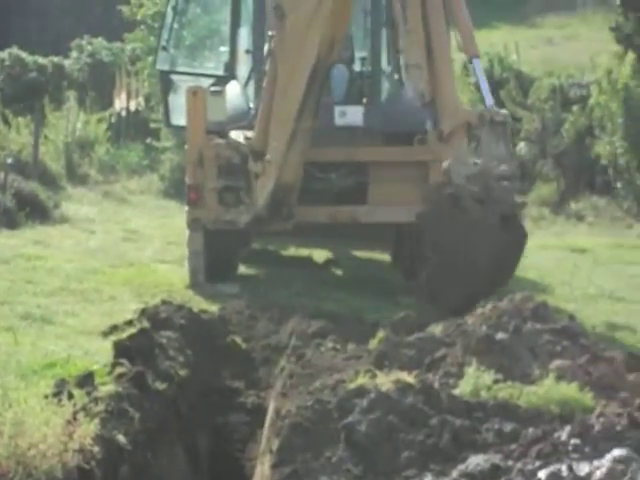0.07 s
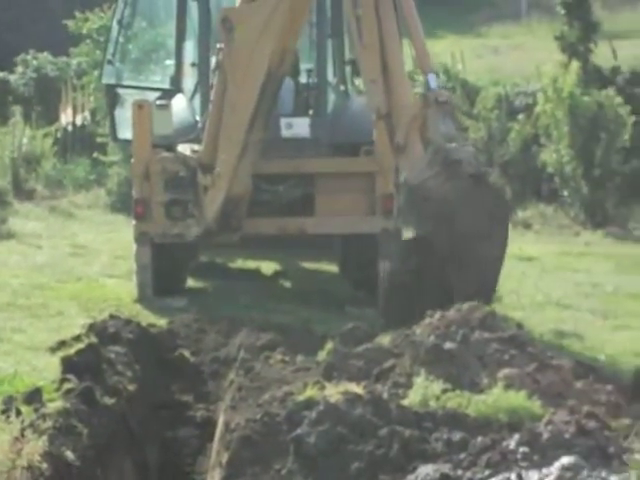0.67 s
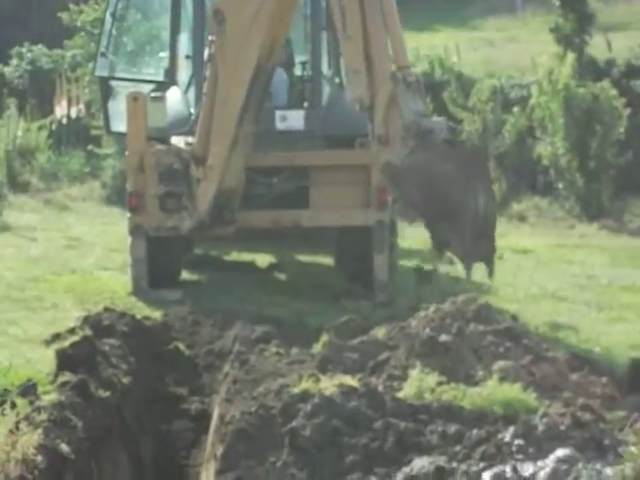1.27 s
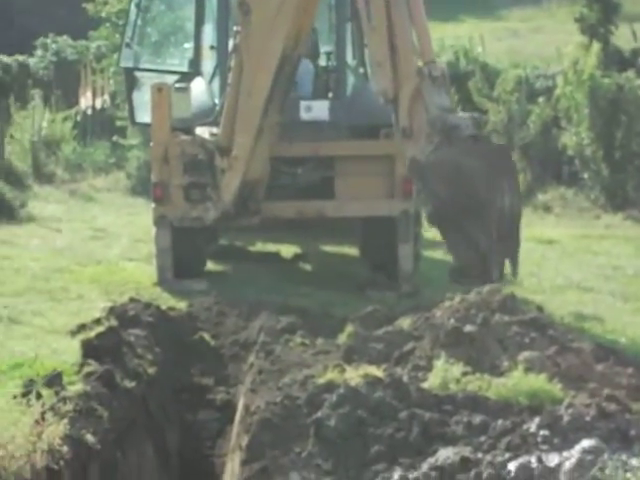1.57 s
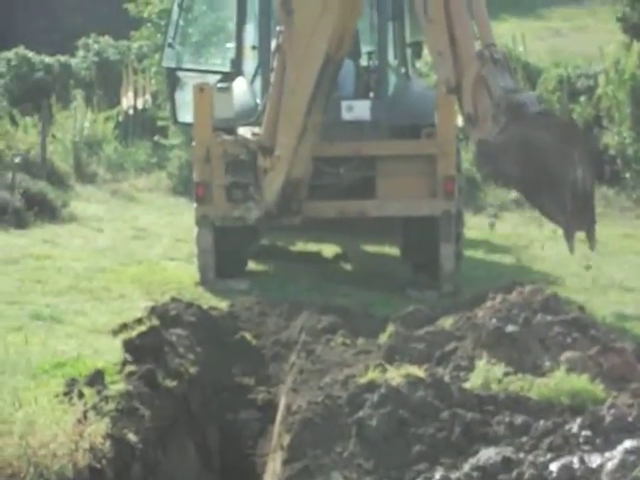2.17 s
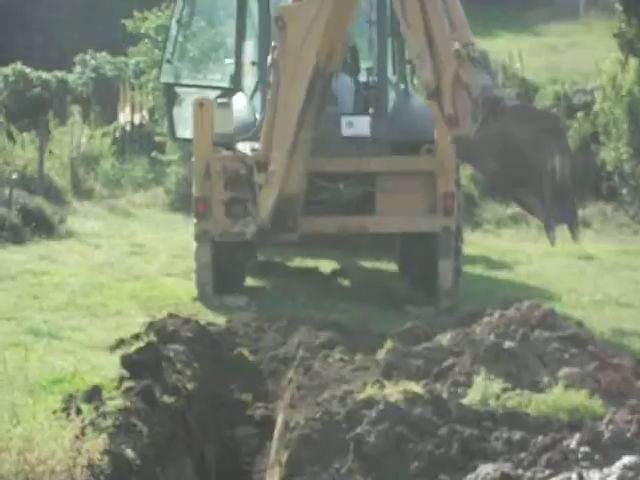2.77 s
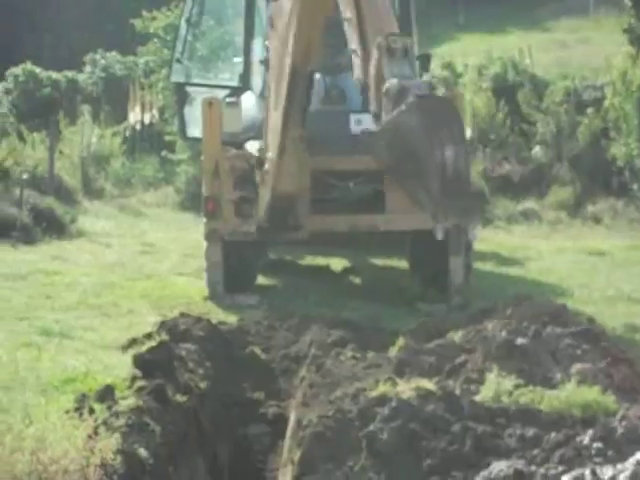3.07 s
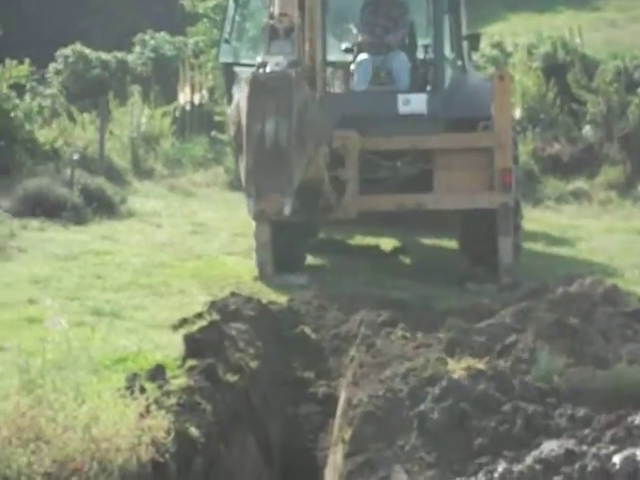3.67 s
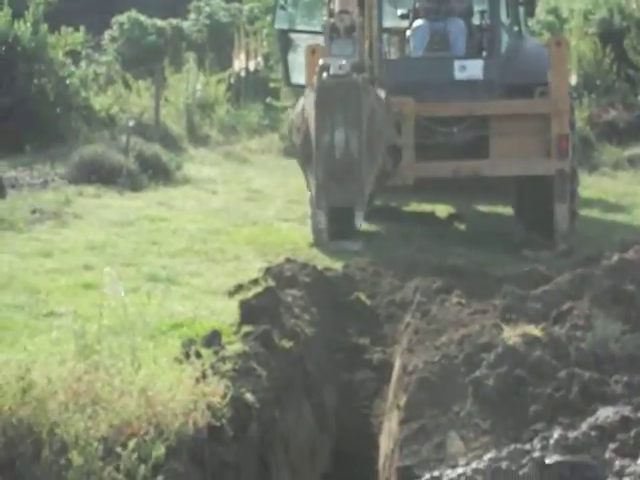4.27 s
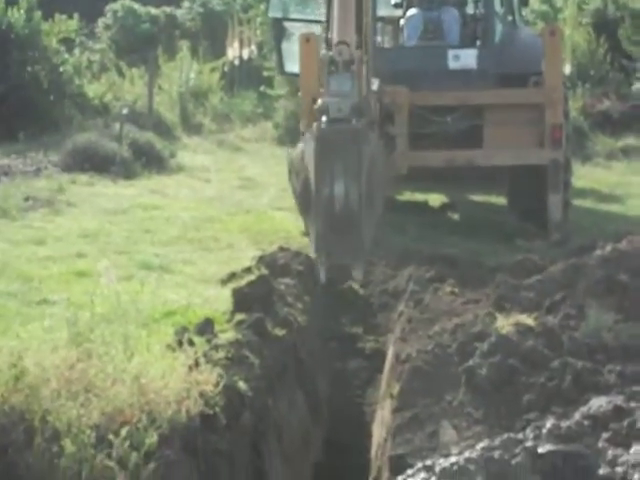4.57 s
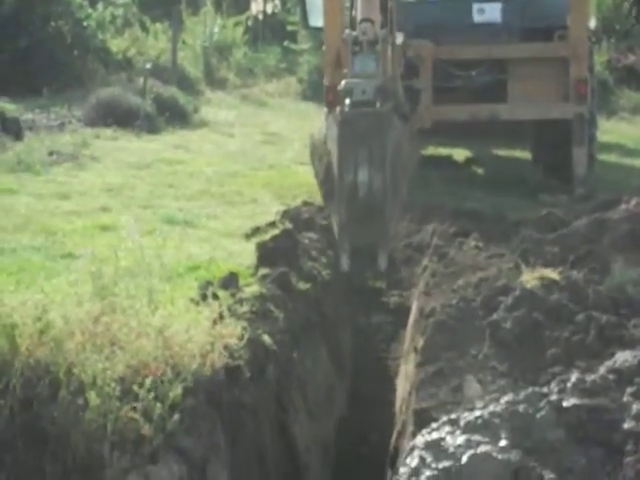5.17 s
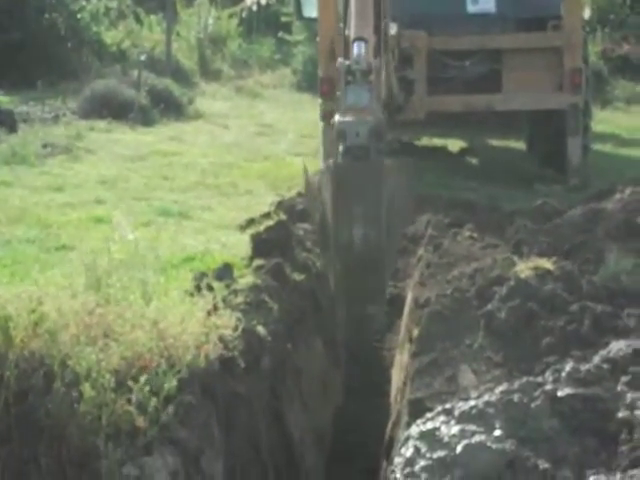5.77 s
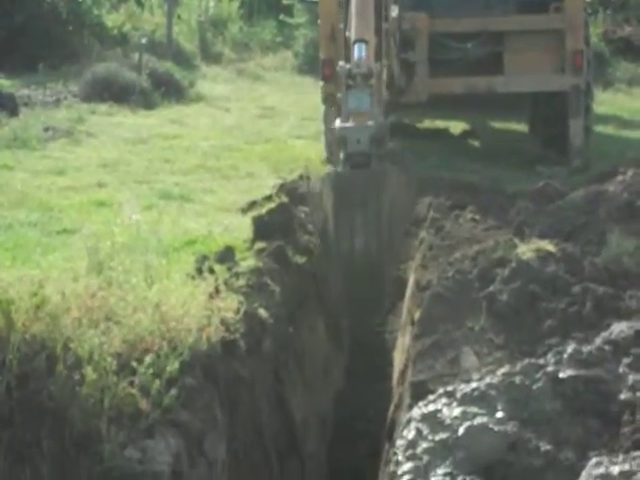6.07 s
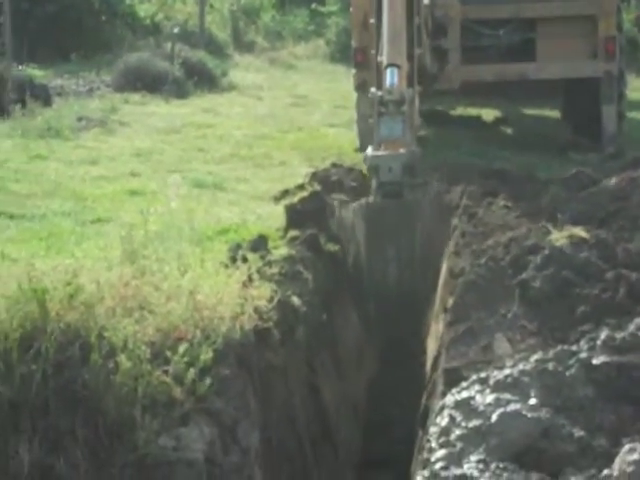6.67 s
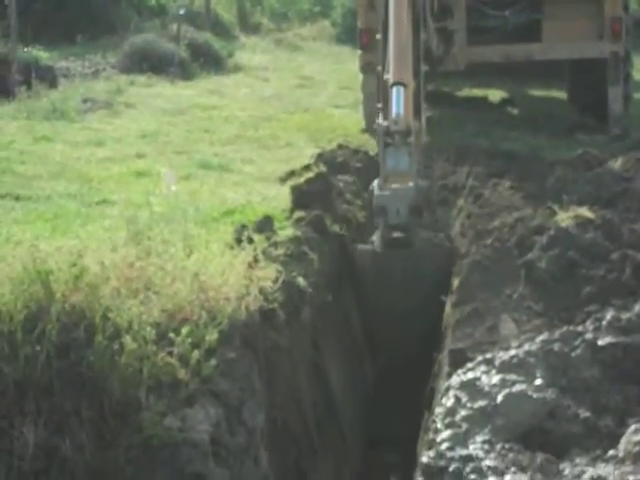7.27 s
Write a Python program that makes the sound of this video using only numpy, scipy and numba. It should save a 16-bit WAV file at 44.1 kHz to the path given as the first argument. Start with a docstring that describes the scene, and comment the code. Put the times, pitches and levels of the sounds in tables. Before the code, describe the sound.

A digger's diesel engine rumbles steadily while its steel bucket clanks and rattles, with light wind and faint birdsong.

```python
"""A backhoe's diesel runs in a garden while its steel bucket is shaken empty, swung round and lowered.
The periodic firings give a harmonic boom and a throbbing clatter, and the speed sags under hydraulic load.
Impacts in the loose pins, rattling links and sliding grit excite the damped resonances of the bucket.
A breeze buffets the microphone, and a songbird whistles among the hedges, which return a thin echo.
The small camera has a narrow band, and its gain control ducks the engine after every hard clank."""
import sys
import numpy as np
from scipy import signal
from scipy.fft import rfft, irfft, next_fast_len
from scipy.io import wavfile
from scipy.ndimage import map_coordinates
from numba import njit

SR = 44100
rng = np.random.default_rng(int(sys.argv[2]) if len(sys.argv) > 2 else 0)


def transcribe(u):
    """Save the signal u as a 16-bit wav file named by the first command-line argument.

    u: samples, shape (n,) or (channels, n), limited to [-1, 1]; the rate is SR.
    q: integer samples, one column per channel.
    """
    v = np.clip(np.atleast_2d(u).T, -1, 1)
    q = np.round(v * 32767).astype(np.int16)
    wavfile.write(sys.argv[1], SR, q)


N = 327222

# engine speed, as the rate at which fan blades pass: time_s, blade_hz
ENGINE_SPEED = [(0, 175), (.3, 173.6), (.45, 177.7), (.7, 174), (1.1, 182.3), (1.35, 174), (1.65, 181),
                (1.85, 178), (2.13, 189), (2.35, 177), (2.66, 180), (2.8, 170), (3.3, 175), (3.6, 181.9),
                (4.3, 180), (5.6, 183.1), (6, 181.1), (7.42, 181.9)]
# exhaust and pump tones at multiples of the firing rate: harmonic_number, relative_level_db
FIRING_HARMONICS = [(1, 0), (2, -18), (3, -18), (5, -12), (10, -21), (15, -17), (20, -23)]
# spectrum of the engine's steady drone: frequency_hz, density_db
DRONE_SPECTRUM = [(12, -11), (30, -13), (60, -6.5), (90, -3.5), (160, -1), (250, -5), (320, -10.5),
                  (450, -13), (900, -70.5)]
# spectrum of the combustion clatter: frequency_hz, density_db
CLATTER_SPECTRUM = [(150, -16), (320, 7), (470, 0), (560, 8.5), (800, 11), (980, 0.5), (1150, 6), (1480, 3),
                    (1830, 6), (2280, -0.5), (2700, 5.5), (3500, 2.5), (4800, 4.5), (6500, -7.5)]
# spectrum of wind on the microphone: frequency_hz, density_db
BUFFET_SPECTRUM = [(12, -1.5), (35, 8), (70, 6.5), (130, 3), (200, -12), (400, -16.5), (900, -58.5)]
# gusts, which fall 20 dB in one decay time: peak_s, decay_s, level_db
WIND_GUSTS = [(1.4, 0.32, -26), (3.8, 0.94, -27.5), (4.35, 1, -24), (7.12, 0.6, -27)]
# stony soil scraping out of the bucket: middle_s, half_length_s, level_db
SOIL_SCRAPES = [(0.014, 0.062, -23), (1.124, .015, -10), (1.182, 0.029, -17.5), (1.973, 0.03, -2),
                (2.249, .016, -9), (2.28, .02, -8), (3.342, 0.1, -24.5)]
# spectrum of grit sliding on steel: frequency_hz, density_db
GRIT_SPECTRUM = [(200, -12), (600, -3), (1500, -6), (3000, -2), (4700, 2.5), (7000, -5.5)]
# bucket resonances, with gain over the broad response: frequency_hz, bandwidth_hz, gain_db
BUCKET_MODES = [(335, 67, 7), (391, 31, -3), (550, 48, -6), (702, 26, 4), (772, 68, -0.5), (850, 22, 1),
                (1260, 98, -1), (1810, 160, -5), (2644, 240, 0), (3660, 200, -3.5), (4243, 160, -6.5),
                (4653, 220, -3)]
# blows of bucket and linkage; hardness is clash over thud: start_s, strength_db, hardness_db, thud_hz, t60_s
BUCKET_BLOWS = [(0.303, -1.5, 9.5, 610, .06), (0.309, 6, 4, 610, 0.1), (0.426, -10.5, -6, 430, 0.18),
                (0.457, 3, 19.5, 360, 0.063), (0.618, -7, -7, 770, 0.093), (0.696, -12, -8.5, 607, 0.09),
                (0.875, 2.5, -9.5, 1200, 0.04), (0.934, 2, 6.5, 596, 0.12), (0.993, 6, 13, 557, 0.13),
                (1.089, -4.5, 5, 764, 0.16), (1.229, -5.5, 8.5, 640, .13), (1.319, -6, -1.5, 780, 0.14),
                (1.343, -8, -1.5, 580, 0.15), (1.396, -12.5, 6.5, 516, 0.14), (1.45, -4, 29, 680, 0.054),
                (1.511, -14, 4.5, 563, 0.11), (1.541, -7, 0.5, 654, 0.069), (1.581, -15, -8.5, 787, 0.16),
                (1.622, -2, 10.5, 534, 0.12), (1.661, -9, 5.5, 660, 0.26), (1.773, -5, 16.5, 706, 0.061),
                (1.795, -5, -1, 594, .15), (1.834, 20, 0, 635, 0.099), (1.856, 14, 2, 704, 0.074),
                (2.094, -4, -1.5, 1010, 0.12), (2.111, -0.5, 2, 587, 0.057), (2.177, -6.5, -4, 1100, .14),
                (2.226, -5.5, 7.5, 785, 0.19), (2.413, -22, -18, 770, 0.13), (2.467, -4, 14, 475, 0.059),
                (2.539, -21, -19, 780, 0.11), (2.607, -18.5, 3, 648.5, 0.21),
                (2.662, -12, -1.5, 760, 0.066), (3.252, -11, -5, 735, 0.16), (3.377, -6.5, 12, 684, .025),
                (3.399, 6.5, 1.5, 720, 0.099), (7.346, -12, 22, 544, 0.12), (7.365, 4, 11, 726, 0.063),
                (7.375, 5.5, 8, 740, 0.15)]
# clear notes of the bird: start_s, length_s, start_hz, end_hz, level_db
BIRD_NOTES = [(2.137, 0.038, 3920, 3880, -23), (3.511, 0.029, 4050, 3820, -30),
              (3.607, 0.026, 3310, 3480, -33.5), (3.663, 0.065, 4850, 5400, -28),
              (3.716, .04, 5250, 4480, -28), (4.253, .047, 3830, 3280, -36),
              (4.434, 0.06, 4500, 5300, -32.5), (4.959, .064, 3900, 3740, -34),
              (5.113, .046, 3790, 3050, -34), (5.614, 0.052, 4220, 3710, -32),
              (5.675, 0.053, 3730, 3200, -33.5), (5.824, 0.056, 3980, 3720, -33.5),
              (6.299, 0.046, 3485, 3240, -28), (6.505, 0.037, 3490, 3540, -27),
              (7.08, .055, 3890, 3640, -36.5)]
# reverberation time among hedges and walls: frequency_hz, t60_s
GARDEN_DECAY = [(200, 0.51), (1000, 0.37), (5000, 0.22)]
# frequency response of the camera: frequency_hz, gain_db
CAMERA_RESPONSE = [(10, -1.5), (4950, -1.5), (5250, -2.5), (5500, -12), (5850, -12.5), (6150, -26.5),
                   (6500, -53.5), (7000, -96)]

TOP_HZ = 15800


def amp(db):
    """Amplitude grows tenfold for every 20 dB."""
    return 10 ** (np.asarray(db) / 20)


def unit(x):
    """Normalisation to an rms of 1."""
    return x / np.sqrt(np.mean(x ** 2) + 1e-20)


def along(points, hz):
    """Interpolation of (frequency_hz, value) points on a logarithmic frequency axis."""
    frequencies, values = np.transpose(points)
    return np.interp(np.log(hz + 1), np.log(frequencies + 1), values)


def wobble(rate_hz):
    """Smooth random modulation: a spline through rate_hz Gaussian values a second."""
    knots = rng.standard_normal(int(N * rate_hz / SR) + 4)
    return map_coordinates(knots, [np.arange(N) * rate_hz / SR])


def filtered(x, response):
    """Linear filtering: the spectrum is multiplied by a complex frequency response."""
    size = next_fast_len(N + SR // 2)
    return irfft(rfft(x, size) * response(np.fft.rfftfreq(size, 1 / SR)), size)[:N]


def noise(spectrum):
    """Spectral shaping turns white noise into coloured noise of rms 1."""
    return unit(filtered(rng.standard_normal(N), lambda hz: amp(along(spectrum, hz))))


def band(hz, centre_hz, q):
    """Two resonators in cascade form a causal band-pass, scaled to unit power."""
    response = (1 + 1j * q * (hz / centre_hz - centre_hz / (hz + 1))) ** -2
    return response / np.sqrt(np.mean(np.abs(response) ** 2))


def engine(no_load_hz=180.9, blades_per_firing=3.43):
    """Periodic firing makes harmonics; load slows the shaft, swells the exhaust and weakens the fan."""
    blade_hz = np.interp(np.arange(N) / SR, *np.transpose(ENGINE_SPEED))
    sag_hz = no_load_hz - blade_hz
    firing_hz = blade_hz * (1 + .002 * wobble(14)) / blades_per_firing
    phase = 2 * np.pi * np.cumsum(firing_hz) / SR
    tones = sum(amp(db + 0.29 * wobble(6)) * np.sin(harmonic * phase + rng.uniform(0, 2 * np.pi))
                for harmonic, db in FIRING_HARMONICS)
    boom = amp(-26.5 + 0.31 * sag_hz) * tones
    fan = amp(-29 - 0.69 * sag_hz + 0.53 * wobble(6.7)) * np.sin(blades_per_firing * phase)
    # each firing gives a burst of clatter; four unequal cylinders make it throb at the shaft rate
    knock = amp(0.27 * np.cos(phase) + 0.54 * np.cos(phase / 2) + 0.4 * wobble(25))
    clatter = amp(-27 + 0.14 * sag_hz) * unit(knock * noise(CLATTER_SPECTRUM))
    drone = amp(-28.5) * noise(DRONE_SPECTRUM)
    return np.sqrt(2) * (boom + fan) + drone + clatter


def breeze(rise_over_decay=0.82, calm_db=-47):
    """Turbulent pressure buffets the microphone; each gust rises faster than it dies."""
    t = np.arange(N) / SR
    gusts_db = [db - 20 * np.maximum((peak_s - t) / rise_over_decay, t - peak_s) / decay_s
                for peak_s, decay_s, db in WIND_GUSTS]
    level_db = np.maximum(np.max(gusts_db, axis=0), calm_db)
    buffeting = unit(amp(2.9 * wobble(11)) * noise(BUFFET_SPECTRUM))
    return amp(level_db) * buffeting


def chatter(size, rate_hz, spread_db, decay_s, blur):
    """Shot noise: tiny random contacts over a steady blur set the power of three noises of rms 1."""
    struck = rng.random(size) < rate_hz / SR
    energy = amp(spread_db * np.minimum(rng.standard_normal(size), 2)) ** 2
    power = signal.lfilter([1], [1, -np.exp(-1 / (decay_s * SR))], struck * energy)
    envelope = np.sqrt((power / (power.mean() + 1e-12) + blur) / (1 + blur))
    return envelope * rng.standard_normal((3, size))


def soil():
    """Sliding friction: grit crosses the steel in short swells of many small contacts."""
    t = np.arange(N) / SR
    grit = chatter(N, rate_hz=270, spread_db=6, decay_s=0.0025, blur=.4)[0]
    flow = sum(amp(db) * np.exp(-((t - middle_s) / half_s) ** 2) for middle_s, half_s, db in SOIL_SCRAPES)
    scrape = filtered(grit, lambda hz: amp(along(GRIT_SPECTRUM, hz)) * (hz < TOP_HZ / 2))
    return flow * unit(scrape)


def bucket_resonance(force, least_width_hz=32):
    """Modal superposition: a force drives the bucket's modes; a minimum bandwidth keeps rings short."""
    def response(hz):
        modes = 0
        for mode_hz, width_hz, db in BUCKET_MODES:
            damping = 1j * hz * max(width_hz, least_width_hz)
            modes += amp(db) * damping / (mode_hz ** 2 - hz ** 2 + damping)
        return 1 + modes
    return filtered(force, response)


def blows(attack_s=0.00066, clang_db=-3, thump_db=-18.5):
    """Impact excitation: each blow is a dying burst of chatter, the brighter the harder the contact."""
    size = 2 ** 14
    t, hz = np.arange(size) / SR, np.fft.rfftfreq(size, 1 / SR)
    force = np.zeros(N + size)
    for start_s, strength_db, hardness_db, thud_hz, t60_s in BUCKET_BLOWS:
        envelope = (1 - np.exp(-t / attack_s)) * amp(-60 * t / t60_s)
        bursts = rfft(envelope * chatter(size, rate_hz=600, spread_db=5, decay_s=0.00086, blur=1))
        bands = [band(hz, thud_hz, q=1.6),  # hollow thud of the shell
                 band(hz, centre_hz=1790, q=0.88),  # clang of the plates
                 band(hz, centre_hz=4356, q=0.98)]  # clash of the pins
        shares = amp([-hardness_db / 2, clang_db, hardness_db / 2])
        clank = shares / np.linalg.norm(shares) @ (bursts * bands)
        thump = amp(thump_db) * band(hz, centre_hz=236, q=0.43) * bursts[1]  # the arm takes up the blow
        force[round(start_s * SR):][:size] += amp(strength_db) * irfft(clank + thump)
    return force[:N]


def agitation(shake_start_s=0.71, shake_end_s=2.415, fade_s=.12, jolt_db=-27, jolt_t60_s=0.36):
    """Incoherent powers add: the rattle's envelope joins a steady shake and each blow's dying jolt."""
    t = np.arange(N) / SR
    outside_s = np.maximum(np.maximum(shake_start_s - t, t - shake_end_s), 0)
    shake = amp(-30.5 - 20 * outside_s / fade_s)
    kicks = np.zeros(N)
    for start_s, strength_db, *_ in BUCKET_BLOWS:
        kicks[round(start_s * SR)] += amp(strength_db + jolt_db) ** 2
    power_retained = amp(-60 / (jolt_t60_s * SR)) ** 2
    jolt_power = signal.lfilter([1], [1, -power_retained], kicks)
    return np.sqrt(shake ** 2 + jolt_power)


def rattle():
    """Repeated collisions: loose links and stones keep ticking between the blows."""
    low, mid, high = chatter(N, rate_hz=220, spread_db=2.5, decay_s=0.0023, blur=0.32)
    knocks = amp(2.5) * filtered(low, lambda hz: band(hz, centre_hz=680, q=1.13))
    clinks = amp(-2) * filtered(mid, lambda hz: band(hz, centre_hz=1870, q=1.0))
    ticks = amp(-2) * filtered(high, lambda hz: band(hz, centre_hz=4320, q=0.46))
    return agitation() * (knocks + clinks + ticks)


def bird(arch_hz=59.7, rasp=0.012, rasp_hz=3700):
    """Frequency modulation: each whistle is an arched glide, and a fast waver makes high ones rasp."""
    song = np.zeros(N + SR)
    waver = rasp * wobble(700)
    for start_s, length_s, start_hz, end_hz, db in BIRD_NOTES + warble_notes(count=6):
        progress = np.linspace(0, 1, round(length_s * SR))
        span = round(start_s * SR) + np.arange(len(progress))
        arch = np.abs(np.sin(np.pi * progress))
        glide_hz = start_hz + (end_hz - start_hz) * progress + arch_hz * arch
        pitch_hz = glide_hz * (1 + waver[span % N] * (glide_hz / rasp_hz) ** 5)
        song[span] += amp(db) * np.sqrt(arch) * np.sin(2 * np.pi * np.cumsum(pitch_hz) / SR)
    return song[:N] * amp(1.2 * wobble(200))


def warble_notes(count, from_s=3.7, to_s=7.1, centre_hz=2900, spread=0.14, length_s=.055, db=-37.5):
    """Random jitter in time, pitch and glide scatters soft notes through the song."""
    shifts, detunes, glides = rng.uniform(-1, 1, (count, 3)).T
    starts_s = from_s + (to_s - from_s) * (np.arange(count) + .5 + shifts / 2) / count
    pitches_hz = centre_hz * (1 + spread * detunes)
    return [(start_s, length_s, hz, hz * (1 + glide * spread / 2), db)
            for start_s, hz, glide in zip(starts_s, pitches_hz, glides)]


def garden_echo(x, delay_s=.025):
    """Reverberation: reflections from hedges and walls arrive late and die soonest in the treble."""
    hz, t, spectra = signal.stft(rng.standard_normal((2, SR // 2))[0], SR, nperseg=256)
    decay = amp(-60 * t / along(GARDEN_DECAY, hz)[:, None])
    tail = signal.istft(spectra * decay, SR, nperseg=256)[1]
    delayed = np.pad(x, (round(delay_s * SR), 0))
    return signal.fftconvolve(delayed, tail / np.linalg.norm(tail))[:N]


def scene():
    """Superposition at one microphone; the bird, further off, has the larger share of echo."""
    bucket = amp(-3) * bucket_resonance(blows() + rattle() + soil())
    song = amp(5) * bird()
    echo = garden_echo(amp(-16) * bucket + amp(-13.5) * song)
    return (engine() + bucket + song + echo + breeze())[None]


@njit
def gain_control(x, threshold, ceiling, attack, release_db_per_s, treble_weight, max_cut_db):
    """Negative feedback: output over the threshold, treble above all, cuts the gain, which creeps back."""
    y = np.zeros_like(x)
    cut_db = 0.
    for i in range(1, len(x)):
        y[i] = min(max(x[i] * 10 ** (-cut_db / 20), -ceiling), ceiling)
        sensed = abs(y[i]) + treble_weight * abs(y[i] - y[i - 1])
        cut_db += (attack * max(sensed - threshold, 0.) - release_db_per_s) / SR
        cut_db = min(max(cut_db, 0.), max_cut_db)
    return y


def record(dry):
    """Compression and band limiting: the camera ducks, keeps a voice band and clips the tallest peaks."""
    held = gain_control(dry[0], threshold=0.48, ceiling=0.78, attack=4540.0,
                        release_db_per_s=37.2, treble_weight=1.24, max_cut_db=20.65)
    narrow = filtered(held, lambda hz: amp(along(CAMERA_RESPONSE, hz)))
    clipped = np.clip(narrow, -.72, .72)
    return filtered(clipped, lambda hz: hz < TOP_HZ)[None]


dry = scene()
out = record(dry)
transcribe(out)
```